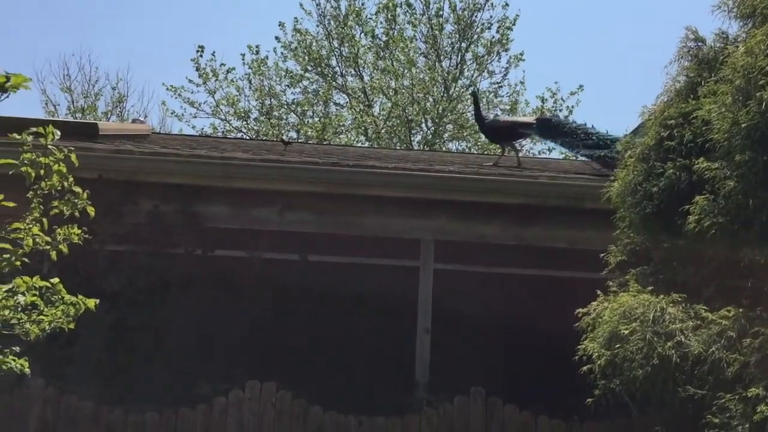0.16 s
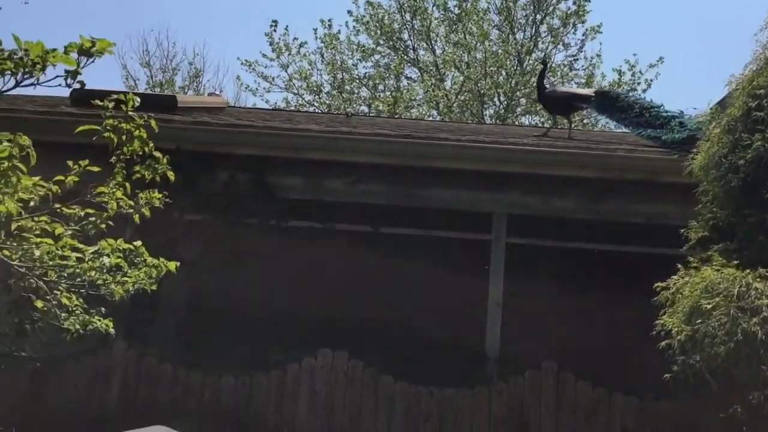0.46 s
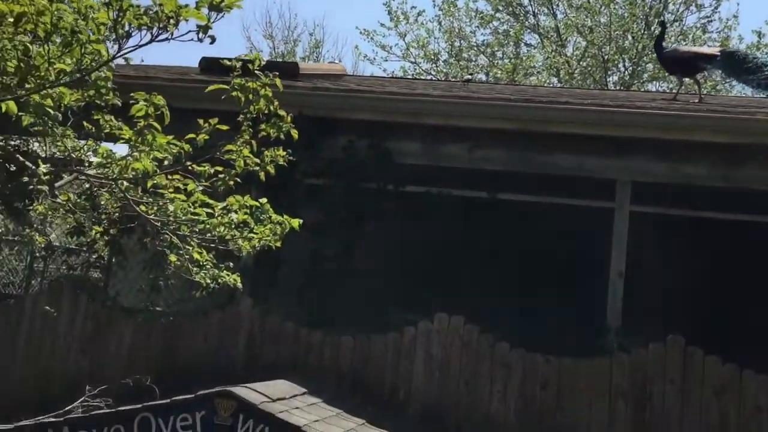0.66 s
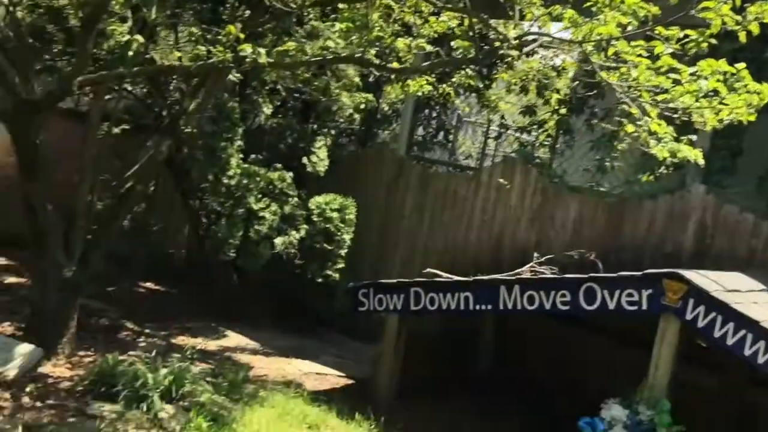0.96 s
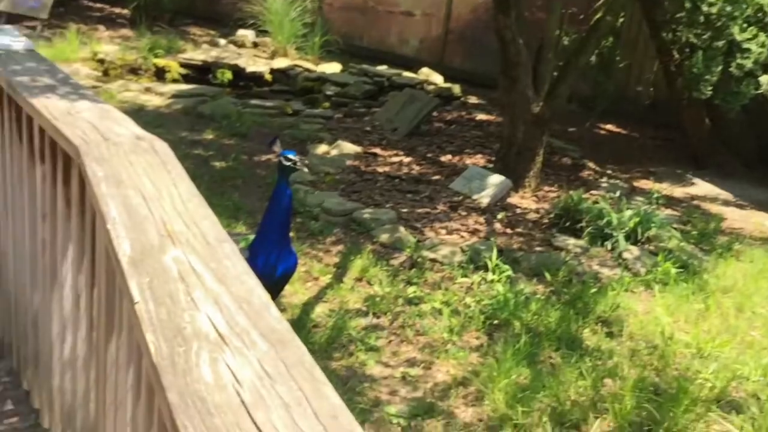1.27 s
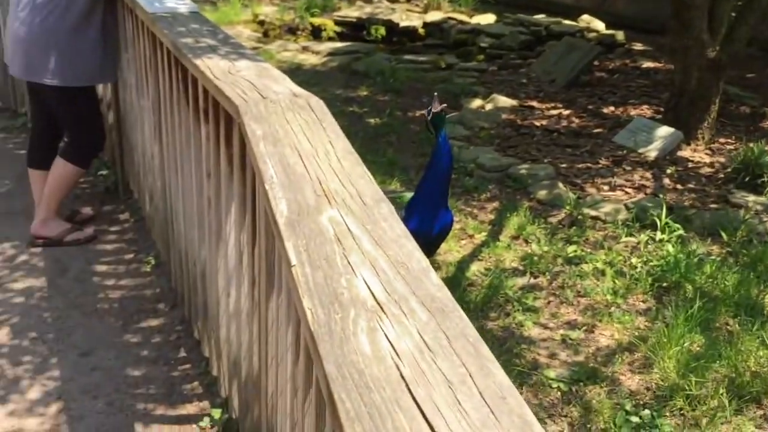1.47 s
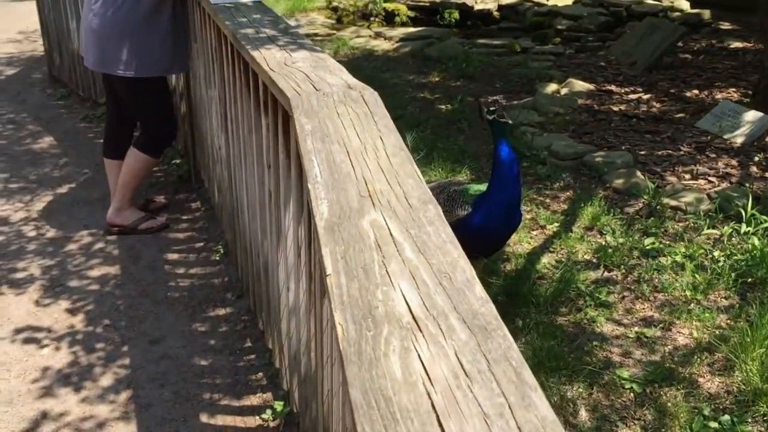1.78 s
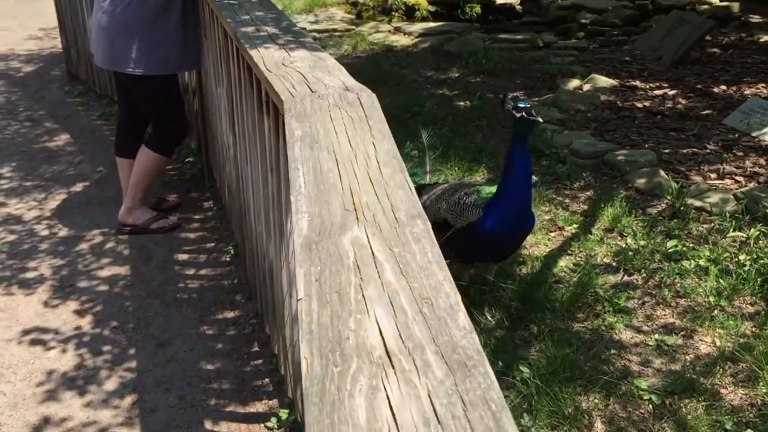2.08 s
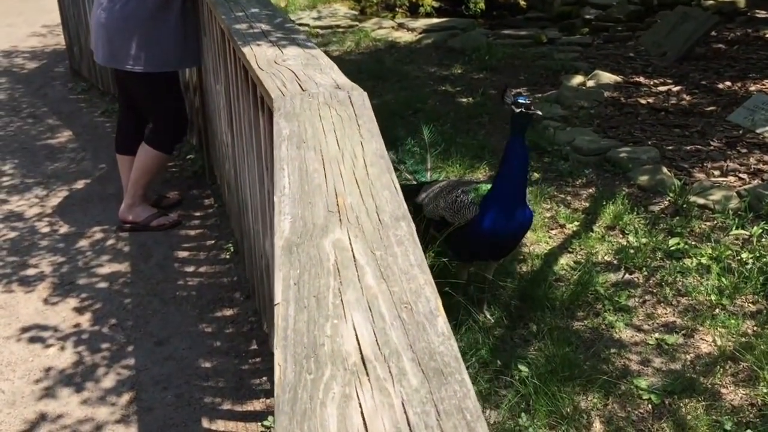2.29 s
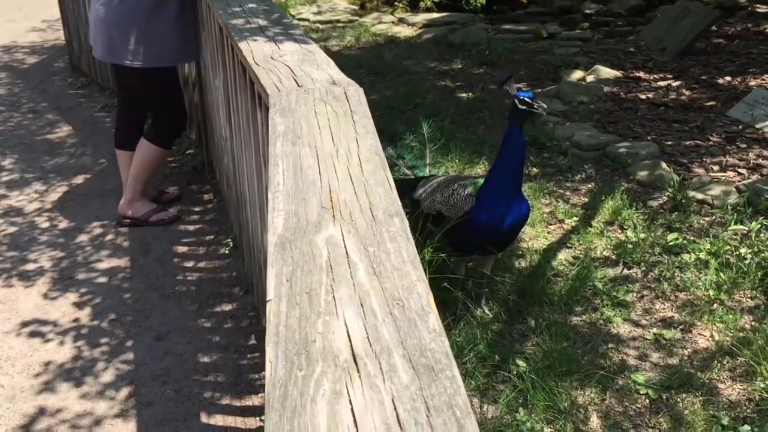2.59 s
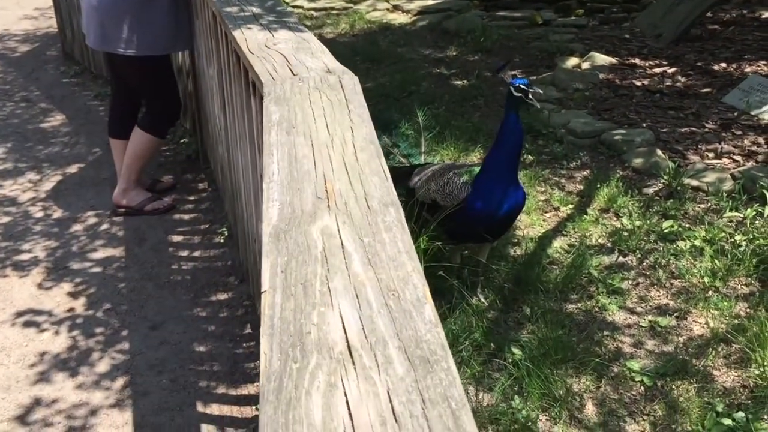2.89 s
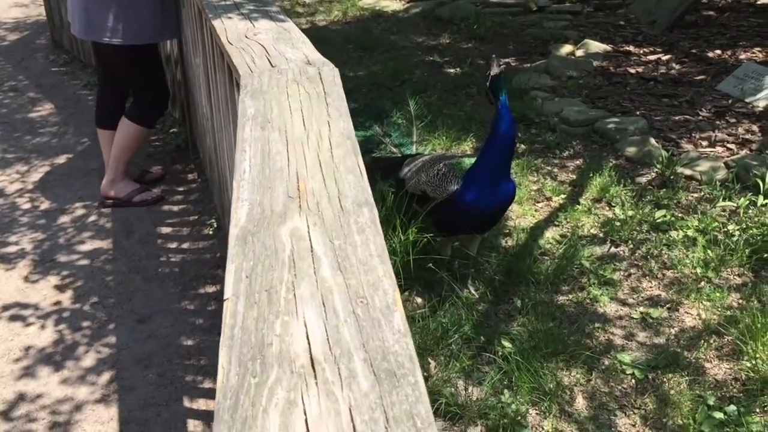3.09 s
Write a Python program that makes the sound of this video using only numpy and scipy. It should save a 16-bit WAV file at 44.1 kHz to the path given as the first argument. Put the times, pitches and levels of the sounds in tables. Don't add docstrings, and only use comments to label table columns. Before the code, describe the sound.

Three loud, brassy peacock cries in an open yard, with a small tick and sparrow chirps between.

```python
import sys
import numpy as np
from scipy import signal
from scipy.fft import rfft, irfft
from scipy.io import wavfile
from scipy.ndimage import uniform_filter1d

SR = 44100
rng = np.random.default_rng(int(sys.argv[2]) if len(sys.argv) > 2 else 0)


def transcribe(u):
    v = np.clip(np.atleast_2d(u).T, -1, 1)
    q = np.round(v * 32767).astype(np.int16)
    wavfile.write(sys.argv[1], SR, q)


def invert_db(level):
    return 10 ** (np.asarray(level, dtype=float) / 20)


N = 143325


def band_pass(x, hz, width):
    return signal.lfilter(*signal.iirpeak(hz, hz / width, SR), x)


def set_level(x, db):
    return x * invert_db(db) / np.sqrt(np.mean(x ** 2))


def walk(rate):
    hold = int(SR / rate)
    steps = np.repeat(rng.standard_normal(N // hold + 1), hold)
    return 1.68 * uniform_filter1d(uniform_filter1d(steps, hold), hold)[:N]


def colour(table, hz):
    table_hz, table_db = np.array(table).T
    return np.interp(np.log(hz), np.log(table_hz), table_db)


def bump(t, at, length):
    return np.exp(-(2 * (t - at) / length) ** 2)


def air():
    # (f/Hz, level/dB per Hz)
    air_colour = [(30, -12.5), (62, -2), (110, -7.5), (450, -19.5), (750, -14.5), (4300, -21.5),
                  (4900, -32), (15500, -45.5)]
    hz = np.maximum(np.fft.rfftfreq(N, 1 / SR), 1)
    noise = rfft(rng.standard_normal(N)) * invert_db(colour(air_colour, hz))
    hiss = 0
    for centre in 22 * 2 ** np.arange(0, 10, 0.5):
        band = irfft(noise * np.maximum(1 - 2 * np.abs(np.log2(hz / centre)), 0), N)
        hiss = hiss + band * invert_db(0.4 * walk(6.74))
    return set_level(hiss, -45)


def motor(t):
    # (multiple of rotation, level/dB, heard until t/s)
    orders = [(3, -48, 1.7), (3.02, -56, 4), (4, -62, 1.3), (5, -62, 1.3), (12.6, -62, 1.25),
              (15, -53, 1.12), (20, -57, 1.1), (25, -58, 1.0)]
    rotation_hz, whine_from_s = 46.6, 0.62
    phase = 2 * np.pi * np.cumsum(rotation_hz * (1 + 0.001 * walk(5))) / SR
    whine_rise = np.clip((t - whine_from_s) / 0.12, 0, 1)
    drone = 0
    for order, db, end in orders:
        tone = invert_db(db + 1 + 1.8 * walk(11)) * np.sin(order * phase)
        if order > 10:
            tone = tone * whine_rise
        drone = drone + tone / (1 + np.exp(np.clip((t - end) / 0.04, -50, 50)))
    return drone


def traffic(t):
    # (t/s, length/s, f/Hz, width/Hz, level/dB)
    passes = [
        (2.67, 0.23, 640, 22, -47),
        (3.2, 0.33, 770, 53, -47),
        (2.84, 0.96, 800, 520, -46),
        (1.2, 0.4, 1850, 1100, -48.5),
        (2.8, .2, 59, 28, -56),
        (2.87, 0.47, 6270, 900, -66),
    ]
    out = 0
    for at, length, hz, width, db in passes:
        noise = band_pass(rng.standard_normal(N), hz, width)
        noise = band_pass(noise, hz, 2 * width)
        out = out + set_level(noise, db) * bump(t, at, length)
    return out


def background(t):
    return air() + motor(t) + traffic(t)


def gain_control(t):
    # (t/s, level/dB)
    gain_curve = [
        (0.0, -57.5),
        (0.42, -59.5),
        (0.61, -58),
        (1.04, -52.5),
        (1.41, -53),
        (1.87, -62.5),
        (2.23, -61.5),
        (2.79, -49.5),
        (3.16, -59),
        (3.25, -72),
    ]
    quiet_db = -50.5
    return invert_db(np.interp(t, *np.array(gain_curve).T) - quiet_db)


def yard(x):
    t60_s, damp_hz, build_s, tail_db = 0.62, 1600, 0.05, -17
    lag = np.arange(SR // 2) / SR
    tail = rng.standard_normal(len(lag)) * invert_db(-60 * lag / t60_s) * np.minimum(lag / build_s, 1)
    tail = signal.lfilter(*signal.butter(2, damp_hz, fs=SR), tail)
    return signal.fftconvolve(x, invert_db(tail_db) * tail / np.sqrt(np.sum(tail ** 2)))[:N]


def twig_tick(t):
    # (f/Hz, level/dB, t60/s)
    modes = [(2100, 8, 0.0092), (3900, 1, 0.019), (6260, -8, .009), (700, -11, 0.02), (11560, -16, 0.0019)]
    snap_s, peak_db = 1.3005, -19.5
    since = t - snap_s
    crackle = rng.standard_normal(N) * (since > 0) * np.exp(-np.abs(since) / 0.00084)
    ring = 0
    for hz, db, t60 in modes:
        width = 2.2 / t60
        ring = ring + invert_db(db) * band_pass(crackle, hz, width) / np.sqrt(width)
    return invert_db(peak_db) * ring / np.max(np.abs(ring))


def sparrows(t):
    # (t/s, length/s, start f/Hz, end f/Hz, level/dB)
    chirps = [
        (0.898, 0.031, 4250, 4070, -40),
        (0.925, 0.051, 3490, 3170, -34.5),
        (0.964, 0.026, 3400, 3140, -44),
        (2.142, 0.097, 5630, 3700, -62),
        (2.859, 0.054, 4190, 4020, -35.5),
        (2.865, 0.032, 4650, 4180, -44),
        (2.89, .02, 3800, 3360, -49),
    ]
    trill_hz, trill_depth = 183, 0.36
    trill = 1 + trill_depth * np.sin(2 * np.pi * trill_hz * t)
    out = 0
    for at, length, start_hz, end_hz, db in chirps:
        along = np.clip((t - at) / length, 0, 1)
        hz = (start_hz + (end_hz - start_hz) * along) * (1 + 0.008 * walk(250))
        whistle = np.sin(2 * np.pi * np.cumsum(hz) / SR)
        out = out + invert_db(db) * np.sin(np.pi * along) * trill * whistle
    return out + invert_db(1.5) * yard(out)


def wail(t, rows, opened, onset, scatter):
    # (f/Hz, level/dB)
    closed = [(660, -13.5), (1330, 11.5), (2000, -55), (2700, -34), (3400, -52.5), (4100, -55), (7000, -44),
              (15500, -65.5)]
    beak_db, beak_width, throat_db, throat_width = 9.5, 0.19, 6, 0.038
    bloom_db, bloom_s = 4, 0.022
    flutter_db, flutter_hz = 2.5, 28
    crack_order, breath_db, attack_s = 11, -52, 0.0059
    rows = np.array(rows, float)
    on = (t >= rows[0, 0]) & (t <= rows[-1, 0])
    since = t[on] - onset
    tracks = [np.interp(t[on], rows[:, 0], rows[:, c]) for c in range(1, 6)]
    hz, db, beak, throat, share = (uniform_filter1d(v, size=900, mode="nearest") for v in tracks)
    hz, beak, throat = (uniform_filter1d(v, size=1600, mode="nearest") for v in (hz, beak, throat))
    share = np.clip(share, 0, 1.2)
    k = np.arange(1, 29)[:, None]
    phase = 2 * np.pi * np.cumsum(hz) / SR

    tops = share * colour(opened, k * hz) + (1 - share) * colour(closed, k * hz)
    tops = tops + beak_db * np.exp(-(np.log(k * hz / beak) / beak_width) ** 2)
    tops = tops + throat_db * np.exp(-(np.log(k * hz / throat) / throat_width) ** 2)
    tops = tops - bloom_db * np.maximum(k - 4, 0) * np.exp(-np.maximum(since, 0) / bloom_s)
    flutter = flutter_db * np.array([walk(flutter_hz)[on] for _ in k]) * (k / 3) ** 0.25
    gains = invert_db(tops + flutter) * (k * hz < 16500)

    smear = k * np.minimum(k / crack_order, 1) ** 2 * scatter[on]
    harmonics = gains * np.sin(k * phase + 0.2275 * np.minimum(k, 12) ** 2 + smear)
    voice = np.sum(harmonics, axis=0) / np.sqrt(np.sum(gains ** 2, axis=0) / 2)
    hiss = band_pass(rng.standard_normal(len(hz)), 6000.0, 6000.0)
    breath = invert_db(breath_db) * share * (1 + np.sin(phase)) * hiss
    out = np.zeros(N)
    out[on] = (voice + breath) * invert_db(db) * np.clip(since / attack_s, 0, 1) ** 2
    return out


def peacocks(t, gain):
    # (t/s, pitch f/Hz, level/dB, beak f/Hz, throat f/Hz, beak open 0-1)
    roof_wail = [
        (0.0, 610.5, -16.5, 2030, 3600, 0.83),
        (0.04, 616.1, -17.5, 2460, 3540, 0.75),
        (0.172, 620, -15.5, 2430, 3680, 0.79),
        (0.264, 635, -18.5, 1350, 3830, 0.73),
        (0.356, 641.3, -16.5, 1340, 3540, 0.76),
        (0.518, 613.2, -23, 1340, 3040, 0.75),
        (0.584, 586.2, -24, 1560, 3430, 0.65),
        (0.642, 542, -37, 1340, 3830, 0.69),
        (0.68, 574, -59, 1340, 3330, 0.95),
    ]
    near_wail = [
        (1.354, 553.4, -17.5, 2040, 2930, 0.86),
        (1.42, 600.8, -14, 1900, 3030, 0.87),
        (1.473, 626, -14.5, 1970, 3680, 0.88),
        (1.68, 649.5, -14.5, 1790, 3900, 1),
        (1.765, 693.3, -17, 1270, 4150, 0.81),
        (1.838, 689.7, -14.5, 1346, 2580, 0.68),
        (1.959, 648.8, -19.5, 1308, 3140, 0.54),
        (2.067, 590.4, -25.5, 1285, 3000, 0.59),
        (2.165, 533, -51, 1200, 3280, 0.93),
    ]
    last_wail = [
        (2.914, 556, -20, 1700, 3070, 0.88),
        (2.951, 589, -15.5, 1890, 2950, 0.88),
        (2.984, 608, -14.5, 1320, 3040, 0.87),
        (3.015, 617.5, -15, 2470, 3300, 0.88),
        (3.064, 631.5, -13, 1810, 3840, 0.87),
        (3.17, 641.2, -13.5, 1880, 3640, 0.96),
        (3.25, 654.7, -17.5, 2010, 3900, 0.97),
    ]
    # (f/Hz, level/dB)
    roof_open = [(620, -18), (1240, -12.5), (1860, -1.5), (2480, 2.5), (3100, -13.5), (3750, -4),
                 (5000, -18), (15500, -46)]
    near_open = [(630, -13.5), (1270, -4.5), (1900, -1), (2550, -1.5), (3200, -5), (3850, -9),
                 (6400, -15.5), (15500, -36.5)]
    onsets = [
        -.3,
        1.354,
        2.914,
    ]
    # (t/s, length/s, phase scatter/rad)
    cracks = [
        (0.054, 0.27, 0.032),
        (0.217, 0.037, .025),
        (0.506, .05, 0.041),
        (1.421, 0.017, .09),
        (1.457, .03, 0.045),
        (1.74, 0.024, .045),
        (3.01, 0.053, 0.052),
    ]
    # (delay/ms, level/dB)
    echoes = [(2.3, -16), (7.1, -18.5), (16.3, -18.5), (31, -17)]
    jitter = 0.002
    scatter = walk(900) * (jitter + sum(depth * bump(t, at, length) for at, length, depth in cracks))
    calls = zip((roof_wail, near_wail, last_wail), (roof_open, near_open, near_open), onsets)
    voices = sum(wail(t, rows, opened, onset, scatter) for rows, opened, onset in calls)
    near = voices
    for delay_ms, db in echoes:
        near = near + invert_db(db) * np.interp(t - delay_ms / 1000, t, voices, left=0)
    return near * invert_db(0.91) + gain * yard(voices)


def scene():
    t = np.arange(N) / SR
    gain = gain_control(t)
    return (gain * background(t) + twig_tick(t) + sparrows(t) + peacocks(t, gain))[None]


def top_cut(x):
    return signal.sosfilt(signal.butter(12, 16430, fs=SR, output="sos"), x)


def record(dry):
    x = np.tanh(1.517 * dry) / 1.53
    x = signal.sosfilt(signal.butter(2, 45, "high", fs=SR, output="sos"), x)
    x = signal.sosfilt(signal.ellip(10, 0.2, 40, 15750, fs=SR, output="sos"), x)
    return top_cut(x)


dry = scene()
out = record(dry)
transcribe(out)
```